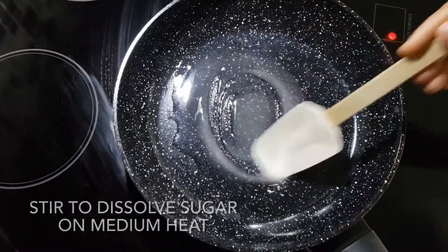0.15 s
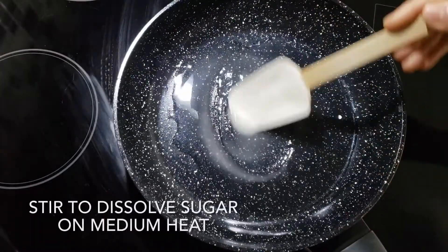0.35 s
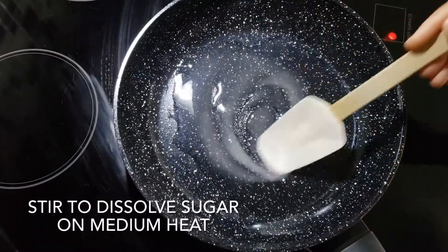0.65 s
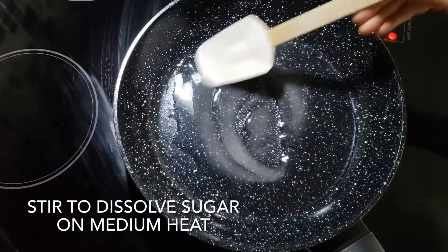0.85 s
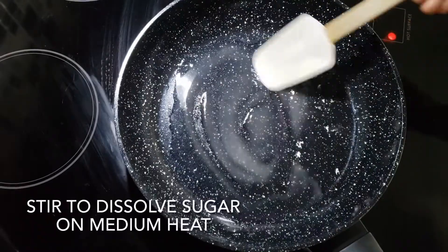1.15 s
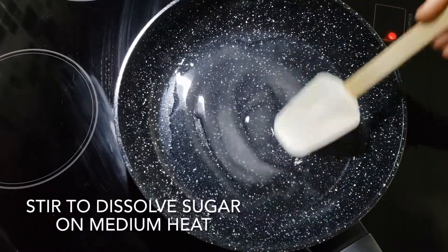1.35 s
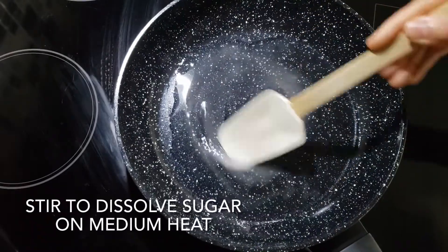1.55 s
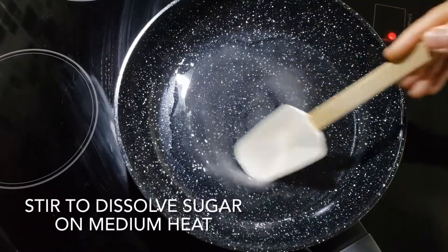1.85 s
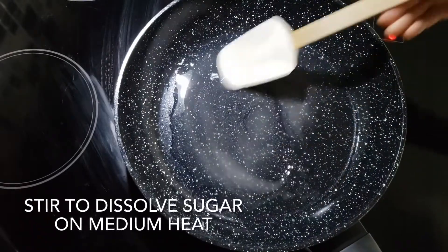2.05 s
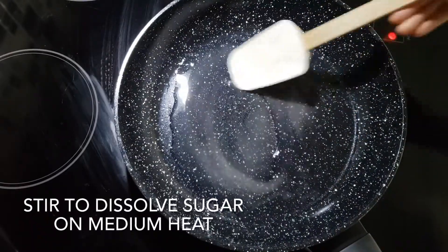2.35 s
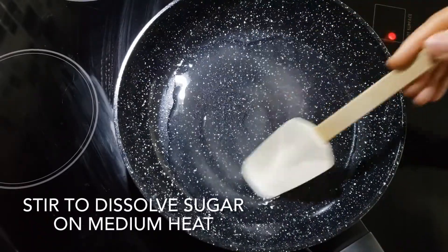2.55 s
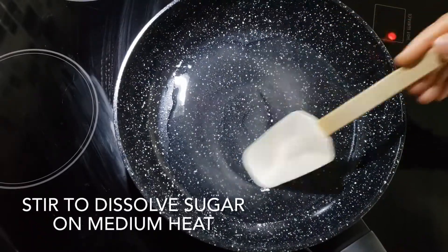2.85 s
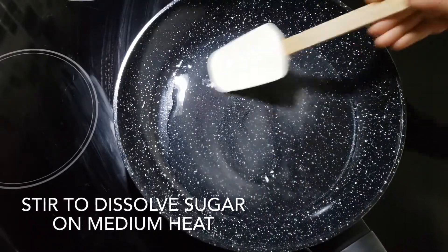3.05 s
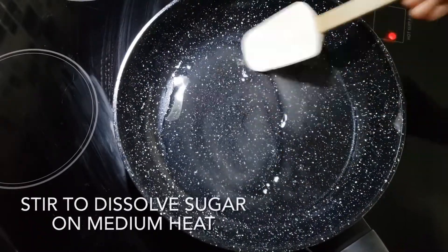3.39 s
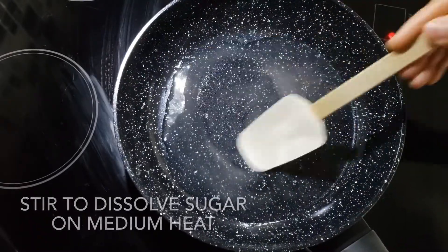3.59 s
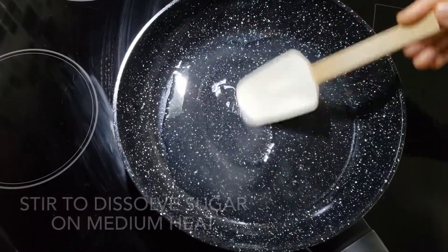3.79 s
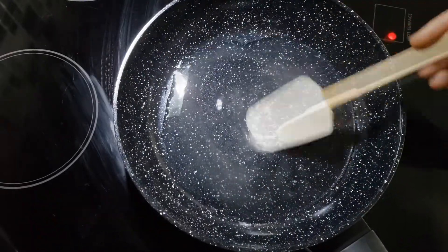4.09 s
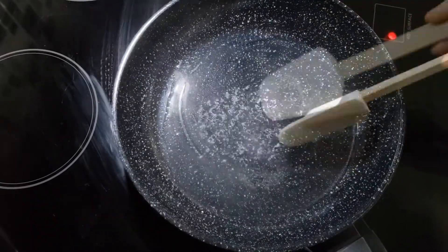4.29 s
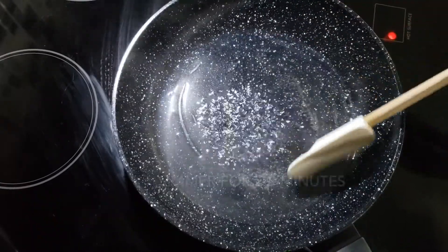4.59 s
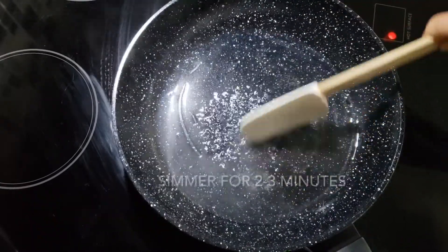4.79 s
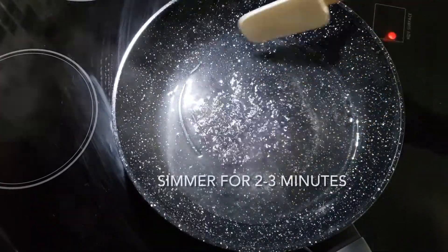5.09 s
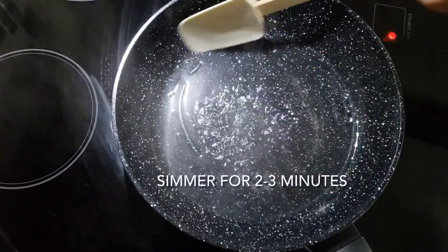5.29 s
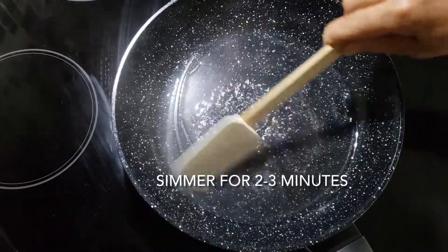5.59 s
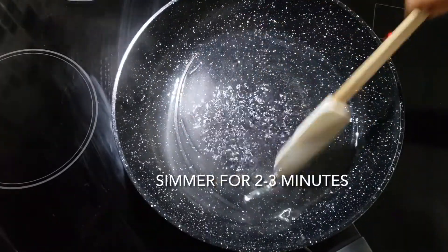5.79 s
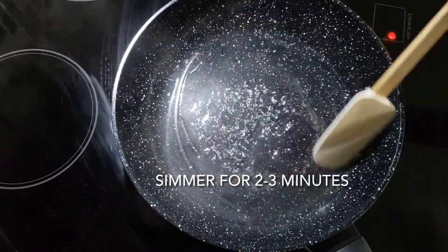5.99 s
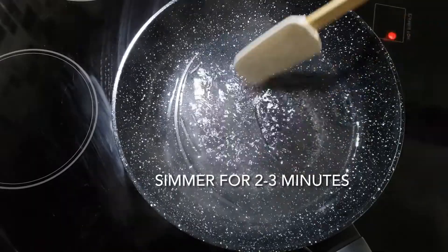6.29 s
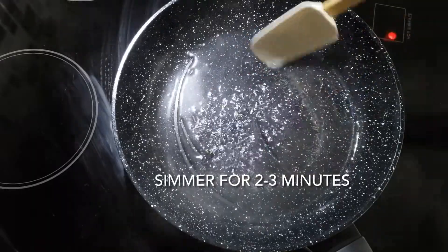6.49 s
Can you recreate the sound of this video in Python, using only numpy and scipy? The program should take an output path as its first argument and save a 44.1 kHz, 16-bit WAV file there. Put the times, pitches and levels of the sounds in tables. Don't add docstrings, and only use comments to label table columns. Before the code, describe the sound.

A quiet, close, dry stereo pickup of a pan in a kitchen, with a low steady fridge hum and soft rumble beneath. From 0 to 4.2 s a soft spatula makes quick, airy, rubbing swishes, about four a second, each swelling and fading, with a faint ringing of the pan. The first 0.7 s is the grittiest, with sugary crunches and a sharp snap near 0.57; scattered ticks follow near 1.0 and 1.8, then smoother, wetter strokes. Around 4.1 to 4.5 s the hum slides to a lower tone in a crossfade and simmering rises: fine, dense bubbling with bright fizz, steady to the end. At 4.75 to 4.87 a short crackly scuff catches the rim. Small clicks come at 5.3 and 5.46, dull bumps at 5.87 and 6.0. The loudest, sharpest scrape crackles at 6.15 to 6.24, then a last tick at 6.37 over sizzling.

```python
import sys
import numpy as np
from scipy import signal
from scipy.fft import rfft, irfft, next_fast_len
from scipy.io import wavfile
from scipy.ndimage import uniform_filter1d, map_coordinates

SR = 44100
rng = np.random.default_rng(int(sys.argv[2]) if len(sys.argv) > 2 else 0)


def field_ratio(decibels):
    return 10 ** (np.asarray(decibels, dtype=float) / 20)


def unload_wav(signal):
    wavfile.write(
        sys.argv[1],
        SR,
        np.round(np.clip(np.atleast_2d(signal).T, -1, 1) * 32767).astype(np.int16),
    )


N = 292824
TIME = np.arange(N) / SR
TOP_HZ = 15800

# f/Hz, left minus right level/dB
LEAN_FAST = [(60, -0.5), (110, 1.5), (200, 2), (380, -5.5), (700, -0.5), (1290, 1), (2380, 6), (4400, -9),
             (8120, -2.5), (15000, -6.5)]
LEAN_SLOW = [(60, 8), (110, -7), (200, -0.5), (380, -15.5), (700, -3.5), (1290, -1.5), (2380, -5.5),
             (4400, -6.5), (8120, -7.5), (11000, 2.5), (15000, -6.5)]
# f/Hz, correlation/1
ALIKE_FAST = [(60, 1.0), (180, 0.8), (550, 0.75), (1650, 0.34), (4970, 0.099), (15000, 0.027)]
ALIKE_SLOW = [(60, 0.75), (180, 0.75), (550, 0.82), (1650, -0.68), (4970, 0.12), (15000, -0.14)]
# f/Hz, correlation/1
FLOOR_ALIKE = [(500, 0.68), (1400, 0.46), (3000, 0.24), (8000, 0.079)]


def unit(x):
    return x / np.sqrt(np.mean(x ** 2) + 1e-20)


def along(points, hz):
    f, v = np.transpose(points)
    return np.interp(np.log(hz + 1), np.log(f + 1), v)


def curves(rows):
    s, *cols = np.transpose(rows)
    return [np.interp(TIME, s, c) for c in cols]


def wobble(rate):
    knots = rng.standard_normal(int(N * rate / SR) + 4)
    return map_coordinates(knots, [TIME * rate])


def sides(db):
    return np.array([field_ratio(db / 2), field_ratio(-db / 2)])


def filtered(x, response):
    m = next_fast_len(N + SR // 2)
    return irfft(rfft(x, m) * response(np.fft.rfftfreq(m, 1 / SR)), m)[..., :N]


def ringing(modes, hz, db):
    resonances = sum(field_ratio(level) * 1j * hz * w / (c * c - hz * hz + 1j * hz * w) for c, w, level in modes)
    return 1 + field_ratio(db) * resonances


def grainy(rate, spread_db, share, t60_s=0.002):
    count = int(rate * N / SR)
    size_db = spread_db * np.minimum(rng.exponential(size=count), 2.5)
    bursts = np.bincount(rng.integers(0, N, count), field_ratio(size_db), N)
    decay = field_ratio(-60 * TIME[:256] / t60_s)
    gate = unit(np.convolve(bursts, decay)[:N])
    share = np.clip(share, 0, 1)
    return rng.standard_normal((2, N)) * np.sqrt(1 - share + share * gate ** 2)


def heard(pair, colour, alike, lean, patchy_db, size=6):
    z = signal.stft(pair, nperseg=512)[2]
    field = uniform_filter1d(rng.standard_normal(z.shape[1:]), size, 0)
    field = uniform_filter1d(field, 10, 1)
    pair = signal.istft(z * field_ratio(patchy_db * unit(field)), nperseg=512)[1][:, :N]
    turn = lambda hz: np.arccos(np.clip(along(alike, hz), -1, 1)) / 2
    mid, side = filtered(pair, lambda hz: colour(hz) * [np.cos(turn(hz)), np.sin(turn(hz))])
    out = filtered(np.array([mid + side, mid - side]), lambda hz: sides(along(lean, hz)))
    return out / np.std(out.mean(axis=0))


def contact(rows, start_db, change_db, rise_s, fall_s):
    start, length = np.transpose(rows)[:2, :, None]
    t = TIME[::32]
    glide = np.clip((t - start) / length, 0, 1) * change_db[:, None]
    ends = np.maximum(start - t, 0) / rise_s + np.maximum(t - start - length, 0) / fall_s
    power = field_ratio(2 * (start_db[:, None] + glide - 20 * ends)).sum(axis=0)
    return np.interp(TIME, t, np.sqrt(power))


def bent(pair):
    wander_s, damp_db = 0.0002, 1.5
    at = np.arange(N) + wander_s * SR * wobble(9)
    delayed = np.array([map_coordinates(x, [at], mode="nearest") for x in pair])
    return delayed * field_ratio(damp_db * wobble(21.83))


def fridge(speed, column):
    # f/Hz, left fast/dB, right fast/dB, left slow/dB, right slow/dB
    hum_lines = np.array([(56.61, -46.3, -45.5, -51.5, -45.9), (113.22, -65.9, -66.3, -65.6, -63.3),
                          (120.0, -64.6, -65.7, -68, -61.3), (240.0, -80, -74, -81, -71)])
    shake = [0, .5, .5, 2]
    out = np.zeros((2, N))
    for line, shake_db in zip(hum_lines, shake):
        level = line[column:column + 2, None] + shake_db * wobble(8)
        phase = 2 * np.pi * (line[0] * speed * TIME + rng.random())
        out += field_ratio(level) * np.sqrt(2) * np.sin(phase)
    return out


def room(spectrum, db, alike, lean):
    noise = rng.standard_normal((2, N))
    return field_ratio(db) * heard(noise, lambda hz: field_ratio(along(spectrum, hz)), alike, lean, patchy_db=1.5)


def residual_hiss():
    # f/Hz, level/dB per Hz
    hiss_colour = [(1470, -18.5), (2500, -2.5), (3220, -4), (4090, -14), (4320, -18), (6490, -13),
                   (11200, -11), (12400, -13), (15700, -16)]
    colour = lambda hz: field_ratio(along(hiss_colour, hz)) * (hz < TOP_HZ)
    return field_ratio(-73) * heard(rng.standard_normal((2, N)), colour, ALIKE_FAST, LEAN_FAST, patchy_db=4.0)


def simmer():
    # t/s, level/dB
    boil_growth = [(4.03, -81), (4.212, -71), (4.228, -65), (4.32, -62), (4.5, -58), (5.0, -60),
                   (5.25, -59), (5.4, -59), (5.6, -58.5), (5.8, -58.5), (6, -58), (6.32, -59.5),
                   (6.64, -59)]
    # f/Hz, level/dB per Hz
    boil_colour = [(260, -72), (450, -5), (517, -1), (564, -10.5), (725, -5), (781, -11), (979, -2.5),
                   (1270, -5), (1430, -1.5), (2570, -3.5), (2950, -5.5), (3350, -9), (4810, -8.5),
                   (9000, -19), (11700, -22), (19800, -120)]
    fizz_colour = [(1760, -61), (3000, -4), (3560, -22), (3900, -3.5), (4900, -6.5), (5600, -5.5),
                   (7800, -3.5), (8750, -8.5), (9400, -2), (15100, -0.5), (15900, 2)]
    # f/Hz, width/Hz, level/dB
    pan_modes = [(925, 41, -0.5), (1405, 230, -11), (2110, 80, -6), (2630, 60, -3), (4900, 140, -4)]
    # f/Hz, phase/rad
    phase_lead = [(500, 0.79), (900, 0.34), (1800, -0.97), (3000, -0.85)]
    boil_db, = curves(boil_growth)
    since = TIME - boil_growth[0][0]
    fizz_db = -55 + 1.8 * np.minimum(boil_db + 60.5, 0) + 1 * since

    floor = lambda hz: field_ratio(along(boil_colour, hz)) * ringing(pan_modes, hz, db=-2.5)
    boil = heard(grainy(250, 2.8, 0.16, t60_s=0.005), floor, FLOOR_ALIKE, LEAN_SLOW, patchy_db=1.2)
    boil = filtered(boil, lambda hz: np.exp(0.5j * np.outer([1, -1], along(phase_lead, hz))))
    fizz = heard(grainy(1000, 2.2, 0.42, t60_s=0.0012), lambda hz: field_ratio(along(fizz_colour, hz)),
                 ALIKE_SLOW, LEAN_SLOW, patchy_db=1.5)
    treble = lambda hz: 1 / (1 + (12500 / (hz + 1)) ** 6) * (hz < TOP_HZ)
    spit = heard(grainy(450, 2.3, 0.75, t60_s=0.0015), treble, ALIKE_SLOW, LEAN_SLOW, patchy_db=0.6)
    surface = fizz + field_ratio(-8.5 + 2 * wobble(28)) * spit
    boil_gain = field_ratio(boil_db + 2.5 + 0.14 * wobble(8.6))
    return (since > 0) * (boil_gain * boil + field_ratio(fizz_db) * surface)


def scuffs():
    # t/s, length/s, level/dB, swell/dB, knock/dB
    scuff_events = [
        (4.738, 0.035, -54, 2, -56.5),
        (4.775, 0.053, -49.5, -1.5, -55.5),
        (6.147, .003, -43, -6, -62),
        (6.161, 0.028, -43, -5, -53),
        (6.195, 0.045, -49.5, -2.5, -56),
        (4.84, 0.054, -62, -7, -62),
    ]
    # f/Hz, level/dB per Hz
    scuff_colour = [(1180, -27), (2000, -2.5), (3090, -4.5), (3830, -31), (5060, -2), (5910, -8), (6450, 0),
                    (8600, -2), (10800, -0.5), (15900, 0.5)]
    knock_colour = [(450, -12.5), (800, -9.5), (1020, -2.5), (1350, -5), (1800, -13), (2600, -9),
                    (4000, -50)]
    flat = [(100, 0), (15000, 0)]
    hiss = heard(grainy(900, 3, 0.45), lambda hz: field_ratio(along(scuff_colour, hz)) * (hz < TOP_HZ),
                 ALIKE_SLOW, flat, patchy_db=1.6)
    knock = heard(grainy(400, 0.92, 0.21), lambda hz: field_ratio(along(knock_colour, hz)),
                  FLOOR_ALIKE, flat, patchy_db=3.0)
    rasp = heard(grainy(460, 2.8, 0.37), lambda hz: np.exp(-(np.log((hz + 1) / 4800) / 0.5) ** 2),
                 ALIKE_SLOW, flat, patchy_db=0.8)
    db, swell_db, knock_db = np.transpose(scuff_events)[2:]
    catch = lambda start_db, change_db: contact(scuff_events, start_db, change_db, 0.0036, 0.039)
    out = catch(db, swell_db) * hiss
    out = out + catch(db - 11.5, swell_db + 7.5) * rasp
    out = out + catch(knock_db, 0 * db) * knock
    return sides(-5.5)[:, None] * out


def pops_and_thuds():
    # t/s, peak level/dB, f/Hz, left minus right level/dB, cycles to the peak/1
    pops = [(0.2728, -43, 10100, 13, 21), (0.6174, -38.5, 10360, 11, 6.1), (0.6205, -50, 3730, -7, 3.7),
            (0.6392, -38, 8800, 8, 3), (0.6428, -40, 8430, 3.5, 3.6), (1.012, -46.5, 6200, -2, 5.3),
            (1.1005, -45, 2580, 3, 7.9), (1.571, -48, 7550, 2, 6.1), (1.842, -46, 10500, 2, 5),
            (1.862, -50, 5800, -5, 4), (1.8714, -49, 3460, -7, 3), (1.9144, -51, 2980, -8, 1.6),
            (4.4094, -50, 2210, -4.0, 3.2), (4.7815, -44, 4900, -5, 3), (4.794, -44, 1040, -4, 1.5),
            (4.802, -41, 1070, -4, 1.5), (4.811, -49, 1050, -4, 1.3), (4.837, -48, 1000, -2, 1.7),
            (4.8224, -32.5, 4560, -8, 1.2), (6.2245, -36, 1730, -10, 1.7), (6.237, -37, 1290, 1.5, 1.5),
            (6.1612, -30, 10800, 1, 6), (2.258, -60, 4100, 0, 8), (2.53, -60, 2270, 2, 6)]
    # t/s, peak level/dB, f/Hz, cycles to the peak/1
    thuds = [(5.331, -55, 510, 4), (.075, -59, 600, 3.3), (4.17, -54, 70, 1.7), (5.36, -53, 126, 3),
             (5.868, -39, 417, 0.33), (5.872, -50, 746, 1.5), (6.004, -42, 115, 2.1),
             (6.101, -41, 118, 0.55), (6.16, -48, 453, 0.5), (6.188, -44, 397, 0.62),
             (6.295, -48, 300, 0.53)]
    thud_lean_db = 3
    events = list(pops) + [(s, db, hz, thud_lean_db, cycles) for s, db, hz, cycles in thuds]
    out, t = np.zeros((2, N + SR)), TIME[:3000]
    for s, db, hz, pan_db, cycles in events:
        at = round(s * SR)
        age = t * hz / cycles
        tone = age * np.exp(1 - age) * np.sin(2 * np.pi * hz * t)
        out[:, at:at + len(t)] += field_ratio(db - 4.5) * sides(pan_db)[:, None] * tone
    return out[:, :N]


def snaps():
    # t/s, peak level/dB, left minus right level/dB, duller part/dB
    cracks = [(0.41, -45, 4, -5), (0.5702, -27, 1, -20), (1.0128, -33.5, -2, -16), (1.1885, -48, -7, -15),
              (1.1912, -47, -3, -15), (1.8, -37, -1, -22), (1.8791, -37, -6, -18), (2.7969, -44, -5, -10),
              (1.0904, -55, 8, -15), (1.2431, -50, 9, -15), (1.853, -50, 0, -15), (2.3092, -57, -2, -12),
              (3.5853, -57, 3, -12), (3.8082, -50, 8, -15), (4.031, -47, -1, 5), (4.0512, -44, 1.5, -8),
              (4.2273, -49, -2, -12), (4.3544, -52, -1.5, -12), (4.7427, -34, -8, -10),
              (4.7502, -22, -6, -18), (4.7765, -40, -4, 0), (4.7835, -32, -4, -16), (4.7885, -28, -3, -8),
              (4.7948, -32, -4, -16), (4.796, -37, -4, -16), (4.8375, -38, -4, -8), (4.868, -40, -4, -15),
              (5.3014, -47, 0, -17), (5.3084, -48, -2, -11), (5.463, -42, -3, -15), (5.4665, -40, -5, -17),
              (6.1468, -34, -2, -10), (6.1481, -23, -2, -18), (6.1497, -18, 0, -16),
              (6.1594, -31, -2.5, -14), (6.1618, -18, 1, -14), (6.1626, -22, 1, -12),
              (6.1715, -20, -8, -12), (6.1728, -29, -12, -7), (6.176, -29, -6, -4), (6.1793, -26, -7, -4),
              (6.1845, -27, -4, -6), (6.1878, -30, 0, -4), (6.2068, -31, -5, -3), (6.2098, -29, -5, -10),
              (6.368, -38, -1, -18), (6.3724, -35, 6, -17)]
    t60_s, glow_db, glow_t60_s = 0.005, -16, 0.025
    apart = 0.26
    out, t = np.zeros((2, N + SR)), TIME[:3000]
    decay = field_ratio(-60 * t / t60_s) + field_ratio(glow_db - 60 * t / glow_t60_s)
    envelope = decay * np.minimum(t / 0.00027, 1)
    for s, db, pan_db, dull_db in cracks:
        noise = rng.standard_normal((3, len(t)))
        noise[0, 12:14] += 2.6 * np.array([1, -1])
        burst = (noise[0] + apart * noise[1:]) * envelope
        parts = []
        for edges in ([9500, 19000], [2500, 7500]):
            part = signal.lfilter(*signal.butter(2, edges, "band", fs=SR), burst)
            parts.append(part / np.abs(part.mean(axis=0)).max())
        bright, dull = parts
        at = round(s * SR)
        out[:, at:at + len(t)] += field_ratio(db - 3.0) * sides(pan_db)[:, None] * (bright + field_ratio(dull_db) * dull)
    return out[:, :N]


def grit():
    # t/s, length/s, from f/Hz, to f/Hz, level/dB
    crunches = [(0.0055, 0.038, 10600, 8300, -48.5), (0.03, 0.065, 6460, 5400, -56.5),
                (0.036, 0.063, 11000, 10000, -53), (0.072, 0.041, 9100, 6400, -51),
                (0.105, 0.038, 7400, 12000, -57), (.262, .013, 15000, 13000, -65.5),
                (0.268, 0.06, 10700, 6600, -53), (0.291, 0.1, 6800, 8300, -52),
                (0.406, 0.028, 7600, 11400, -54.5), (0.564, 0.057, 6100, 5800, -59.5),
                (0.55, 0.13, 10000, 8000, -56), (0.69, 0.044, 8050, 9700, -64),
                (0.567, 0.027, 14500, 15000, -56), (.59, .03, 15500, 14500, -60),
                (2.58, 0.065, 9000, 5500, -69), (3.2, .05, 5500, 9000, -68), (3.84, .025, 7000, 10400, -66),
                (1.182, 0.027, 12900, 11200, -59.5), (3.803, .035, 14800, 14000, -63),
                (3.798, 0.048, 9500, 11000, -62.5)]
    width_per_s = 4.2
    hz, t, z = signal.stft(grainy(750, 3.4, 0.2), SR, nperseg=256, noverlap=192)
    power = np.zeros(z.shape[1:])
    for start, length, from_hz, to_hz, db in crunches:
        u = np.clip((t - start) / length, 0, 1)
        width = width_per_s * length
        centre = from_hz * (to_hz / from_hz) ** u
        swell = np.sin(np.pi * u ** 0.75) ** 2
        peak = np.exp(-2 * (np.log((hz[:, None] + 1) / centre) / width) ** 2)
        power += field_ratio(2 * db) * swell * peak * SR / (1.62 * width * centre)
    crunch = signal.istft(z * np.sqrt(power), SR, nperseg=256, noverlap=192)[1][:, :N]
    return crunch * sides(2.4)[:, None]


def flares():
    # t/s, length/s, level/dB, f/Hz
    wall_flares = [(0.01, 0.14, -62, 3360), (0.272, 0.089, -69, 3300), (0.382, 0.048, -70, 3400),
                   (0.444, 0.048, -76, 3320), (0.595, 0.072, -65.5, 3450), (0.72, 0.04, -72, 3380),
                   (0.94, 0.037, -70, 3430), (1.098, 0.034, -72, 3380), (1.325, 0.034, -69, 3470),
                   (1.512, 0.19, -65.5, 3450), (1.736, 0.039, -64, 3420), (1.832, 0.14, -73, 3460),
                   (2.053, 0.034, -73, 3430), (2.336, 0.045, -69, 3320), (2.447, 0.046, -67, 3320),
                   (2.682, 0.051, -76, 3440), (2.775, 0.05, -65, 3370), (2.865, 0.074, -67, 3500),
                   (3.114, 0.046, -69, 3400), (3.4, 0.086, -69, 3420), (3.49, 0.047, -68, 3350),
                   (3.03, 0.042, -71, 3410), (3.56, 0.037, -75, 3380)]
    floor_flares = [(0.004, 0.062, -67, 2100), (0.068, 0.066, -78, 2130), (0.144, 0.1, -67, 2140),
                    (0.256, 0.1, -64.5, 2080), (0.34, 0.033, -73, 2090), (0.386, 0.025, -66, 2130),
                    (0.457, 0.037, -68, 2110), (1.18, 0.047, -66.5, 2100), (1.355, 0.03, -70, 2120),
                    (1.624, 0.097, -68, 2120), (1.946, 0.056, -71, 2110), (2.764, 0.049, -69, 2110),
                    (2.42, .06, -70, 2130), (2.93, .04, -72, 2120), (3.634, 0.032, -69, 2170),
                    (.31, .03, -67, 1920), (.7, 0.036, -68, 1397), (3.1, .03, -67, 2180),
                    (3.195, .03, -75, 2240), (3.26, 0.032, -66, 1880), (3.3, 0.064, -66, 1400),
                    (3.6, .03, -69, 2390), (3.64, .05, -72, 1380), (.06, .05, -73, 850)]
    rim_flares = [(0.696, 0.053, -63, 10200), (0.9, 0.025, -67, 10200), (0.942, 0.034, -75, 10400),
                  (1.086, 0.046, -67, 10200), (1.185, 0.036, -69, 10200), (1.227, 0.047, -64, 10100),
                  (1.335, 0.066, -69, 10100), (1.477, 0.054, -72, 10200), (1.55, 0.12, -65, 10200),
                  (1.768, 0.048, -62.5, 10200), (1.828, 0.036, -70, 10200), (1.872, 0.077, -62, 10200),
                  (2.57, 0.05, -66, 10300), (2.626, 0.032, -66, 10250), (2.772, 0.0424, -72, 10250),
                  (2.862, 0.042, -65, 10250), (3.263, 0.032, -67, 10200), (3.301, 0.048, -71, 10400),
                  (3.582, 0.045, -71, 10200), (3.65, 0.029, -71, 10200), (3.803, 0.036, -71, 10300)]
    blur = 0.075
    spread = 1.4
    out = np.zeros((2, N + SR))
    for rows, pan_db in ((wall_flares, 1), (floor_flares, 3), (rim_flares, 4)):
        for s, length, db, hz in rows:
            t = TIME[:round(spread * length * SR)]
            walk = np.cumsum(blur * rng.standard_normal((2, SR // 2)), axis=1)[:, :len(t)]
            at = max(round((s - (spread - 1) * length / 2) * SR), 0)
            swell = 2 * np.sin(np.pi * t / t[-1])
            tone = np.sin(2 * np.pi * hz * t + walk[0] + 0.442 * walk)
            out[:, at:at + len(t)] += field_ratio(db - 2) * sides(pan_db)[:, None] * swell * tone
    return out[:, :N]


def stirring():
    # t/s, length/s, landing/dB, swell/dB, pan body under it/dB
    strokes = [(0, 0.19, -60, 3, -13), (0.288, 0.19, -63.5, 1, -7.5), (0.538, 0.19, -63, 2, -9),
               (0.847, 0.13, -69.5, 12, -11.5), (1.065, 0.054, -67, 6.5, -6),
               (1.193, 0.073, -66.5, 5, -7.5), (1.321, 0.068, -66.5, 1, -4), (1.468, 0.2, -64.5, 3.5, -7),
               (1.756, 0.2, -66, 4.5, -7), (2.06, 0.12, -67.5, -5.5, -3.5), (2.219, 0.046, -67, -1.5, -6.5),
               (2.305, 0.19, -72.5, 3.5, -4.5), (2.575, 0.059, -66.5, 2.5, -8.5),
               (2.701, 0.12, -64.5, -1, -7), (2.877, 0.071, -69.5, 5.5, -5),
               (3.032, 0.13, -67.5, 0.5, -6.5), (3.254, 0.076, -65.5, 4.5, -8),
               (3.416, 0.25, -69, 3.5, -7.5), (3.764, 0.069, -67.5, -0.5, -6),
               (3.884, 0.038, -69.5, -0.5, -1), (4.046, 0.07, -68.5, -6, -20), (4.154, 0.13, -70.5, -5, -3)]
    # f/Hz, level/dB per Hz
    rub_colour = [(530, -24), (900, -5), (1810, 0.5), (2140, 3), (3100, 6.5), (3420, 4.5), (4560, -6.5),
                  (8720, -7), (10100, -7.5), (12400, -10), (15900, -6.5)]
    # f/Hz, width/Hz, level/dB
    pan_modes = [(1392, 35, 2), (1690, 22, -3.5), (2120, 48, 0), (2383, 44, -6.5), (3320, 46, -3.5),
                 (3460, 27, 0), (4900, 68, -22), (7200, 150, -9), (7680, 120, -10), (8240, 70, -12),
                 (9340, 90, -9), (10280, 81, -2), (10310, 89, -2), (11400, 45, -5), (11400, 250, -6),
                 (13200, 180, -11), (13980, 70, 2), (12950, 60, -6), (15800, 280, 1)]
    # t/s, left minus right level/dB
    stir_lean = [(0, 7), (2, 5.5), (3.2, 5), (4.2, 7)]
    land_s, lift_s = 0.042, 0.085
    db, swell_db, body_db = np.transpose(strokes)[2:]

    def arcs(over_db, change_db):
        return contact(strokes, db + over_db, swell_db + change_db, land_s, lift_s)

    def drag(lo_hz, hi_hz, ring_db, patchy_db):
        def colour(hz):
            band = field_ratio(along(rub_colour, hz)) / (1 + (lo_hz / (hz + 1)) ** 12) / (1 + (hz / hi_hz) ** 16)
            return band * (hz < TOP_HZ) * ringing(pan_modes, hz, ring_db)
        return bent(heard(grainy(900, 3.0, 0.13), colour, ALIKE_FAST, LEAN_FAST, patchy_db, size=3))

    face = arcs(0, 0) * drag(4140, 12100, ring_db=8, patchy_db=3.8)
    edge = arcs(-3.5, -4.5) * drag(10300, 17000, ring_db=8, patchy_db=3.5)
    body = arcs(body_db, 1.5) * drag(970, 3230, ring_db=8, patchy_db=2)
    wall = arcs(-4 + 0.94 * body_db, 0) * drag(2950, 4360, ring_db=8.5, patchy_db=5.0)
    return sides(curves(stir_lean)[0]) * (face + edge) + body + wall


def scene():
    # t/s, share of the second scene/1
    dissolve = [(4.08, 0.0058), (4.5, 0.98)]
    # f/Hz, level/dB per Hz
    room_fast = [(12, -22), (20, -13), (32, -10.5), (62, -3), (87, -9.5), (112, -11.5), (135, -16.5),
                 (185, -15.5), (269, -25.5), (354, -25), (549, -32), (1050, -35.5), (1810, -39.5),
                 (2150, -51), (3000, -45), (3900, -86), (6600, -120)]
    room_slow = [(12, -66), (20, -7), (38, -5), (59, -2), (72, -5.5), (86, -6.5), (119, -8.5), (136, -16),
                 (156, -15.5), (240, -18), (338, -25.5), (375, -18.5), (700, -58), (910, -54), (1540, -120)]
    room_db = (-55, -54.5)
    later = np.clip(np.interp(TIME, *np.transpose(dissolve)), 0, 1)
    fast = fridge(1.5, 1) + room(room_fast, room_db[0], ALIKE_FAST, LEAN_FAST) + residual_hiss()
    slow = fridge(1.0, 3) + room(room_slow, room_db[1], ALIKE_SLOW, LEAN_SLOW)
    background = (1 - later) * fast + later * slow
    steady = background + simmer() + scuffs() + grit() + flares() + stirring()
    clicks = pops_and_thuds() + snaps()
    leaky = lambda hz: np.where(hz < TOP_HZ, 1, field_ratio(-31))
    return filtered(steady, lambda hz: hz < TOP_HZ) + filtered(clicks, leaky)


def band_limit(x):
    return signal.sosfilt(signal.butter(12, 16810, fs=SR, output="sos"), x)


def record(dry):
    return band_limit(dry)


dry = scene()
out = record(dry)
unload_wav(out)
```